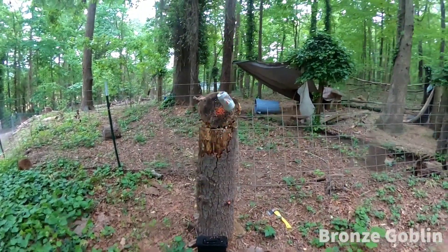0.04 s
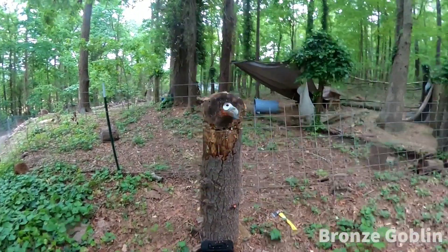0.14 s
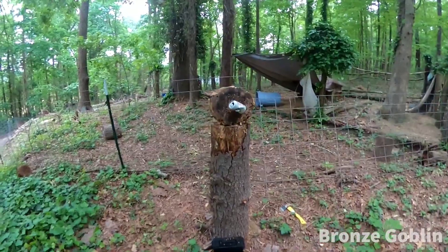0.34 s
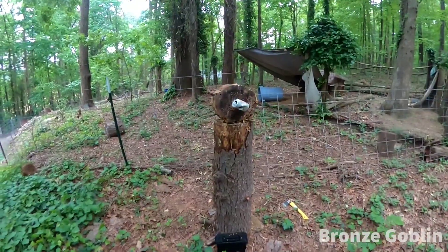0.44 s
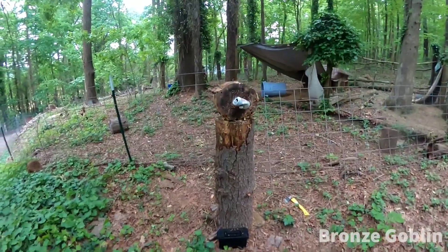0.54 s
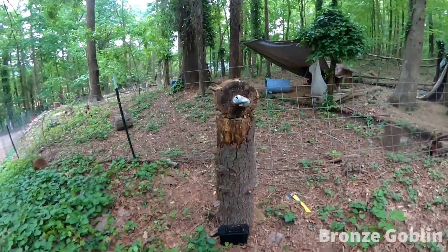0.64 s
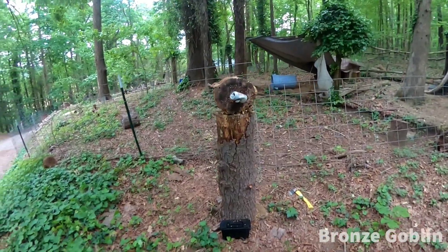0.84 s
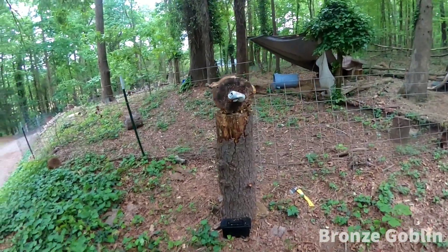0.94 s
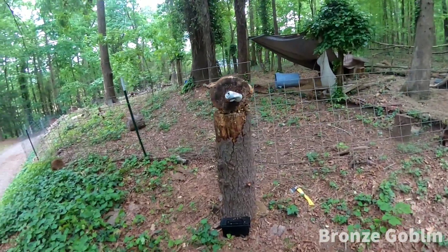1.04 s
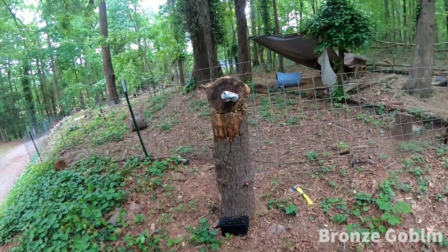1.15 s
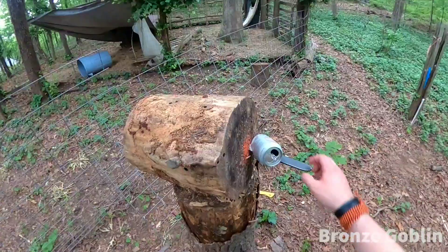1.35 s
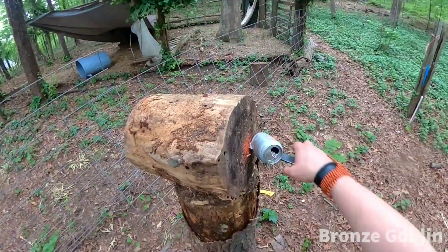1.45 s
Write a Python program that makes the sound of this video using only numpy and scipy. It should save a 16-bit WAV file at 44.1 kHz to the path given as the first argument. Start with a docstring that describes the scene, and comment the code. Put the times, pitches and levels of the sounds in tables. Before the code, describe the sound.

A thrown knife punches through a thin metal can into a log, with woodland echo

```python
"""Woodland air and a low distant hum come first, with small ticks and a brush of cloth near the microphone.
An arm swishes past the microphone and a thrown knife rings in flight, punches a thin metal can, crumples it
and thuds into a log; the trees send back a soft echo. Wind puffs reach the right port, far insects follow.
Blows ring damped modes, air, swish, cloth and echo are shaped noise; gain control ducks all after the blow."""
import sys
import numpy as np
from scipy import signal
from scipy.fft import rfft, irfft
from scipy.io import wavfile
from scipy.ndimage import uniform_filter1d

SR = 44100
rng = np.random.default_rng(int(sys.argv[2]) if len(sys.argv) > 2 else 0)


def volts(x):
    """Linear amplitude factor 10**(x/20) for a level x in dB, scalar or array-like."""
    e = np.asarray(x, float) / 20
    return 10 ** e


def wav_out(sig):
    """Save sig, one row per channel (or a flat mono array), as 16-bit PCM at SR to the path in sys.argv[1]."""
    wavfile.write(sys.argv[1], SR, np.round(np.clip(np.atleast_2d(sig).T, -1, 1) * 32767).astype(np.int16))


N = 66150
T = np.arange(N) / SR


def evened(x):
    """Scales to an rms of one over all channels."""
    return x / np.sqrt(np.mean(x ** 2) + 1e-20)


def read(points, hz):
    """Reads a table by frequency, straight lines over log frequency."""
    f, value = np.transpose(points)
    return np.interp(np.log(hz + 1), np.log(f + 1), value)


def curve(rows):
    """Gain along a table of t/s, level/dB; silent outside it."""
    s, db = np.transpose(rows)
    return volts(np.interp(T, s, db, left=-200, right=-200))


def bell(at_s, width_s):
    """Gaussian rise and fall around one moment."""
    return np.exp(-.5 * ((T - at_s) / width_s) ** 2)


def pair(shape, same):
    """Two complex random channels with the given left-right likeness."""
    a, b = rng.standard_normal((2,) + shape) + 1j * rng.standard_normal((2,) + shape)
    same = np.clip(same, -1, 1)
    return np.array([a, same * a + np.sqrt(1 - same ** 2) * b])


def colour(x, tone):
    """Filters by a spectrum and evens the level."""
    gain = volts(read(tone, np.fft.rfftfreq(N, 1 / SR)))
    return evened(irfft(rfft(x) * gain, N))


def ring(modes, rise_s):
    """Response of a struck body: decaying sines, one a mode, behind a soft onset."""
    t = T[:SR // 3]
    onset = 1 - np.exp(-(t / rise_s) ** 2)
    return onset * sum(volts(db - 60 * t / t60) * np.sin(2 * np.pi * hz * t) for hz, db, t60 in modes)


# Wall modes of the thin can: f/Hz, level/dB, t60/s
CAN_MODES = [(920.5, -9.5, 0.016), (1013, -11.5, .018), (1164, 1.5, 0.0095), (1394, 11.5, 0.0046),
             (1663, -7.5, 0.011), (1731.5, -14, 0.033), (2505, -15, 0.0055), (3250, -11.5, 0.005),
             (3546, -12.5, 0.024), (4930, -14.5, 0.033), (5880, -18, .012), (7000, -19, 0.007),
             (8900, -24, .01), (11700, -27.5, .008), (733, -27.5, .17), (772, -30.5, 0.062)]
# Blows and buckles of the can: t/s, impulse level/dB, contact time/s
CAN_BLOWS = [(.33015, 6, 0.00025), (.3374, -6.5, 0.0001), (.3401, -7.5, 0.00007), (0.3402, -3.5, 0.000057),
             (.342, -8.5, 0.00012), (0.3439, -5, .00012), (.3472, -11, 0.000045)]
CAN_RISE_S, CAN_EDGE_HZ = .0009, 650


def can():
    """Half-sine blows ring the wall modes; a high-pass takes off the bottom."""
    force = np.zeros(N)
    for s, db, contact_s in CAN_BLOWS:
        u = (T - s) / contact_s
        push = np.sin(np.pi * u) * (u > 0) * (u < 1)
        force += volts(db) * push * np.pi / (2 * contact_s * SR)  # a short contact is a hard one
    wall = signal.fftconvolve(force, ring(CAN_MODES, CAN_RISE_S))[:N]
    high_pass = signal.butter(2, CAN_EDGE_HZ, "high", fs=SR, output="sos")
    return signal.sosfilt(high_pass, wall) * volts([[1.], [-.9]])  # slightly left


# Course of the crumpling wall: t/s, relative level/dB
CRUMPLE_COURSE = [(.3302, -60), (.3312, -25), (.3365, -26), (.3378, -15), (.342, -15), (.346, -19),
                  (.35, -27), (.36, -38), (.375, -50), (.4, -70)]
# Spectrum of the crumpling: f/Hz, relative level/dB per Hz
CRUMPLE_TONE = [(300, 0), (631, -18), (1850, -12), (3030, -13.5), (3520, -11), (4580, -19), (6270, -13),
                (8310, -22.5), (10500, -26.5), (14500, -44.5), (16000, -77.5)]
CRUMPLE_DB, CRACKS_PER_S, CRACK_SPREAD_DB = 7, 12000, 3.5


def cracks():
    """The wall crumples in a spray of random cracks; the treble differs a little between the ports."""
    size = volts(CRACK_SPREAD_DB * np.minimum(rng.exponential(1, N), 4)) * rng.choice([-1., 1.], N)
    spray = size * (rng.random(N) < CRACKS_PER_S / SR)
    apart = colour(rng.standard_normal((2, N)), [(300, -20), (1000, -4), (4000, -4), (12000, 0)])
    both = colour(spray + .14 * spray.std() * apart, CRUMPLE_TONE)
    return volts(CRUMPLE_DB) * curve(CRUMPLE_COURSE) * both


# Modes of the wooden log: f/Hz, level/dB, t60/s
LOG_MODES = [(210, 11, 0.015), (190, -15, 0.5), (432, -0.5, 0.041), (475, -12.5, 0.63), (533, -22, 0.12)]
# Modes of the jolted ground: f/Hz, level/dB, t60/s
GROUND_MODES = [(57, -8, 0.03), (97, -6.5, 0.04)]
# Thuds into the log: t/s, relative level/dB, push +1 or pull -1
THUDS = [(.3345, -22, 1), (.3432, -9, -1), (.3493, -8, 1)]
THUD_DB, THUD_S = -3, 0.00053  # added to every thud; Gaussian width of a push
GROUND_PAN_DB = -8  # left minus right


def log():
    """Soft Gaussian pushes ring the wood and jolt the ground."""
    force = np.zeros(N)
    for s, db, way in THUDS:
        force += way * volts(db + THUD_DB) * bell(s, THUD_S) / (THUD_S * SR * np.sqrt(2 * np.pi))
    wood = signal.fftconvolve(force, ring(LOG_MODES, .0002))[:N]
    ground = signal.fftconvolve(force, ring(GROUND_MODES, .0002))[:N]
    return wood * volts([[.4], [-.3]]) + ground * volts(np.array([[.5], [-.5]]) * GROUND_PAN_DB)


# Fading of the echo among the trees: f/Hz, t60/s
ECHO_T60 = [(200, 0.24), (1000, 1), (3000, 0.93), (7000, 0.95), (12000, 0.33)]
# Spectrum of the echo: f/Hz, relative level/dB
ECHO_TONE = [(120, -20.5), (210, -3.5), (300, -13.5), (480, 6.5), (600, -1.5), (750, 4.5), (950, -3),
             (1200, 1.5), (2000, -3.5), (3500, -6.5), (5000, -12), (6500, -9), (9000, -18.5),
             (12000, -32.5), (15000, -49.5)]
# Echo at the two ports: f/Hz, left-right likeness
ECHO_SAME = [(100, 0.84), (800, 1), (1300, 0.54), (3000, .75), (12000, .7)]
ECHO_START_S, ECHO_DB = .31, 5
ECHO_PEAK_S, ECHO_RISE_S = .18, .13  # swell of the far trunks, counted from the echo's start
NEAR_DB, NEAR_T60_S = 12, .25  # near reflections against the far swell


def trees():
    """Noise echo: near reflections die fast; scattered trunks build a swell that fades band by band."""
    hz, t = np.fft.rfftfreq(256, 1 / SR), np.arange(SR // 64) * 64 / SR
    z = pair((len(hz), len(t)), read(ECHO_SAME, hz)[:, None])
    late = np.maximum(t - ECHO_PEAK_S, 0)
    early = np.minimum(t - ECHO_PEAK_S, 0)
    far = volts(-60 * late / read(ECHO_T60, hz)[:, None] - 10 * (early / ECHO_RISE_S) ** 2)
    near = volts(NEAR_DB - 60 * t / NEAR_T60_S)
    shape = (far + near) * volts(read(ECHO_TONE, hz))[:, None]
    tail = signal.istft(z * shape, nperseg=256, noverlap=192)[1]
    fade_in = np.clip(T[:tail.shape[1]] / 0.01, 0, 1) ** 2
    tail = tail * fade_in / np.linalg.norm(tail[0])
    out, at = np.zeros((2, N)), round(ECHO_START_S * SR)
    out[:, at:at + tail.shape[1]] = volts(ECHO_DB) * tail
    return out


# Effort of the arm passing the microphone: t/s, level/dB
SWING_EFFORT = [(.2, -83), (.22, -75), (.238, -41), (.256, -39.5), (.266, -39.5), (.272, -52),
                (.285, -56.5), (.305, -58), (.33, -34.5)]
# Spectrum of the swish: f/Hz, relative level/dB per Hz
SWISH_TONE = [(150, -40.5), (300, -12), (500, -15.5), (1140, -24), (2280, -27), (4500, -26.5), (6880, -24),
              (12600, -40), (14500, -53.5), (16000, -89)]
# Swish at the two ports: f/Hz, left-right likeness
SWISH_SAME = [(300, 1), (1000, 0.98), (3000, 0.61), (9000, 0.13)]
BUFFET_HZ, BUFFET_DB, BUFFET_S, BUFFET_WIDTH_S = 46, -28, .258, 0.032


def swing():
    """Noise hiss of the arm through the air and a low buffet on the microphone."""
    same = read(SWISH_SAME, np.fft.rfftfreq(N, 1 / SR))
    hiss = colour(irfft(pair((N // 2 + 1,), same), N), SWISH_TONE)
    buffet_tone = [(5, -6), (BUFFET_HZ, 0), (160, -12), (600, -60), (3000, -140)]
    low = colour(pair((N,), 0.99).real, buffet_tone)
    return curve(SWING_EFFORT) * hiss + volts(BUFFET_DB) * bell(BUFFET_S, BUFFET_WIDTH_S) * low


# Blade modes ringing in flight: f/Hz, peak level/dB
BLADE_MODES = [(5879, -54), (7100, -63), (8581, -57.5), (11698, -59), (12312, -61), (14799, -86)]
FLIGHT_S, FLIGHT_WIDTH_S = .293, .012


def blade():
    """The blade sings as it passes: steady modes under one short swell."""
    tones = sum(volts(db) * np.sin(2 * np.pi * (hz * T + rng.random())) for hz, db in BLADE_MODES)
    return bell(FLIGHT_S, FLIGHT_WIDTH_S) * tones


SNAP_S, SNAP_DB, SNAP_RELAX_S = 1.4075, -27.5, 0.00081


def snap():
    """One abrupt click: a downward step that relaxes."""
    return -volts(SNAP_DB) * (T > SNAP_S) * np.exp(-np.maximum(T - SNAP_S, 0) / SNAP_RELAX_S)


# Small ticks: t/s, level/dB before the decay, f/Hz, decay/cycles, left minus right/dB
TICKS = [(.066, -53, 7500, 3, 0), (.1112, -35, 7000, 4, 4), (.1245, -49, 7500, 2, 2),
         (.147, -54, 7000, 2, 0), (.1905, -45, 6000, 1.5, -3.5), (.9633, -25, 1500, 1.5, 0),
         (1.4817, -41, 4400, 4, 1), (1.4825, -42, 5700, 3, 1)]


def ticks():
    """Short damped wavelets, each placed between left and right."""
    out = np.zeros((2, N))
    for s, db, hz, cycles, pan_db in TICKS:
        u = np.maximum(T - s, 0) * hz  # cycles since the start
        wavelet = np.sin(2 * np.pi * u) * np.exp(-u / cycles) * np.minimum(u, 1)
        out += volts(db + np.array([[.5], [-.5]]) * pan_db) * wavelet
    return out


# Clothes rustling as the thrower moves: t/s, level/dB
RUSTLE_COURSE = [(0, -97), (.1, -57), (.13, -88), (.2, -89), (.25, -105), (1.36, -81.5), (1.407, -72),
                 (1.409, -48.5), (1.5, -46.5)]
# Spectrum of the cloth: f/Hz, relative level/dB per Hz
RUSTLE_TONE = [(250, -35.5), (400, -13.5), (686, -8), (1110, -3), (2000, -20), (5000, -38), (8000, -32.5),
               (12000, -50.5), (15000, -86)]


def rustle():
    """Dense faint crackle of cloth: random grains over a little noise."""
    size = volts(1.5 * rng.exponential(1, N))
    dense = rng.random(N) < 14000 / SR  # grains a second
    grains = size * dense * rng.standard_normal(N)
    cloth = grains + .3 * grains.std() * rng.standard_normal((2, N))
    return curve(RUSTLE_COURSE) * colour(cloth, RUSTLE_TONE)


# Wind puffs on the right port: t/s, level/dB, width/s
PUFFS = [(.14, -56, 0.022), (.2, -50, .02), (.635, -40, 0.017), (.69, -29.5, 0.012), (0.751, -44, 0.022),
         (.86, -50, .015), (1.44, -52, 0.024)]
# Spectrum of a puff: f/Hz, relative level/dB per Hz
PUFF_TONE = [(10, -14), (40, 10), (90, 6), (200, -28), (500, -45), (3000, -120)]


def wind():
    """Low turbulence, noise under Gaussian gusts, that reaches the right port only."""
    gusts = sum(volts(db) * bell(s, width_s) for s, db, width_s in PUFFS)
    return gusts * colour(rng.standard_normal(N), PUFF_TONE) * np.array([[0], [1]])


# Course of the far insects: t/s, level/dB
INSECT_COURSE = [(.8, -75), (.95, -73), (1.25, -72), (1.29, -90)]
# Spectrum of the insects: f/Hz, relative level/dB per Hz
INSECT_TONE = [(3500, -43), (4800, 0), (5500, -10), (6400, 0.5), (7600, -9.5), (9500, -17), (11000, -50)]


def insects():
    """Far insects blur into a band of treble noise."""
    return curve(INSECT_COURSE) * colour(pair((N,), 0.58).real, INSECT_TONE)


# Partials of the low distant hum: f/Hz, rms level/dB, width/Hz
HUM_PARTIALS = [(91.35, -43.5, 2.7), (144.4, -41.5, 3.8), (676, -58.5, 75), (219, -54, 75)]
HUM_STEADY = .4  # share of steady tone against wavering


def hum():
    """Each partial is a steady tone plus a narrow wavering band."""
    out = np.zeros(N)
    for hz, db, width in HUM_PARTIALS:
        r = np.exp(-np.pi * width / SR)
        waver = signal.lfilter([1], [1, -2 * r, r * r], pair((2 * N,), 1)[0])[N:]  # settled half
        waver = waver / np.sqrt(np.mean(abs(waver) ** 2))
        steady = np.exp(2j * np.pi * rng.random())
        z = HUM_STEADY * steady + (1 - HUM_STEADY) * waver
        out += volts(db) * evened((z * np.exp(2j * np.pi * hz * T)).real)
    return out


# Spectrum of woodland air and far traffic: f/Hz, relative level/dB per Hz
AIR_TONE = [(12, -50), (20, -9.5), (49, -1.5), (111, -23.5), (128, 0), (151, -3), (357, -23.5), (656, -21),
            (818, -27), (1240, -24), (2480, -44), (6360, -56.5), (15000, -68.5)]
# Air at the two ports: f/Hz, left-right likeness
AIR_SAME = [(30, .99), (100, .998), (200, .999), (400, .993), (800, .997), (1100, .9), (2000, .85),
            (5000, .5), (15000, .6)]
AIR_DB, AIR_PATCH_DB, AIR_SWELL_DB = -38, 1.2, .7  # rms level; rms depth of patches and of swell


def air():
    """Random short-time spectra with drifting patches and a slow swell."""
    frames, hz = N // 256 + 5, np.fft.rfftfreq(1024, 1 / SR)
    patches = uniform_filter1d(rng.standard_normal((513, frames)), size=10, axis=0)
    patches = evened(uniform_filter1d(patches, size=12, axis=1))
    swell = evened(uniform_filter1d(rng.standard_normal(frames), size=40))
    z = pair((513, frames), read(AIR_SAME, hz)[:, None])
    z = z * volts(read(AIR_TONE, hz)[:, None] + AIR_PATCH_DB * patches + AIR_SWELL_DB * swell)
    return volts(AIR_DB) * evened(signal.istft(z, nperseg=1024, noverlap=768)[1][:, :N])


def scene():
    """The blow with its echo, the background, the throw and the small near sounds at the two ports."""
    hit = can() + log() + cracks() + trees()
    background = air() + hum() + wind() + insects()
    near = swing() + blade() + ticks() + snap() + rustle()
    return hit + background + near


def top_cut(x):
    """Nothing passes above the cut-off."""
    return signal.sosfilt(signal.butter(12, 15710, fs=SR, output="sos"), x)


DUCK_FROM_DB, DUCK_SHARE, RECOVER_DB_PER_S = -23, 0.46, 8.5  # share: dB taken off per dB over


def record(dry):
    """Gain control falls with the blow and recovers slowly; peaks clip at full scale."""
    power = uniform_filter1d((dry ** 2).mean(0), size=600, origin=299)  # over the samples just past
    power_db = 10 * np.log10(abs(power) + 1e-12)
    rise = T * RECOVER_DB_PER_S
    held_db = np.maximum.accumulate(power_db + rise) - rise  # peak hold that sinks slowly
    over_db = np.maximum(held_db - DUCK_FROM_DB, 0)
    ducked = dry / volts(DUCK_SHARE * uniform_filter1d(over_db, size=400, origin=199))
    mix = np.clip(ducked, -1, 1)
    return top_cut(mix)


dry = scene()
out = record(dry)
wav_out(out)
```